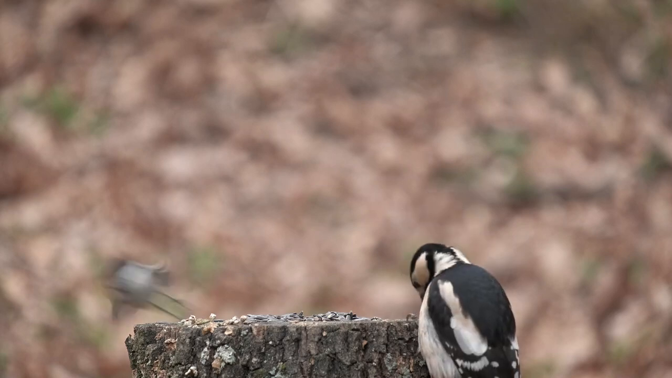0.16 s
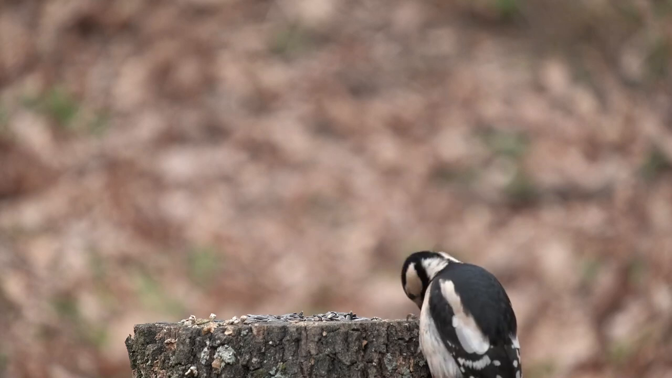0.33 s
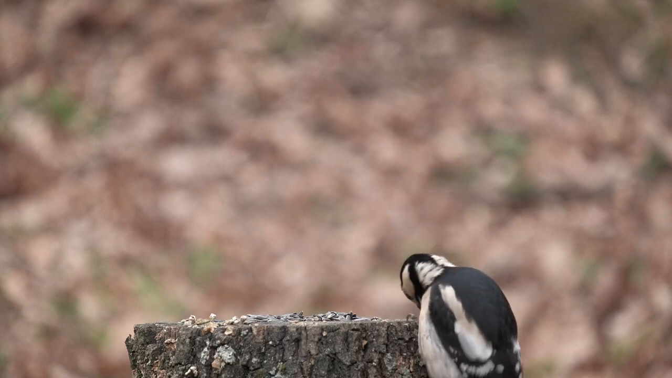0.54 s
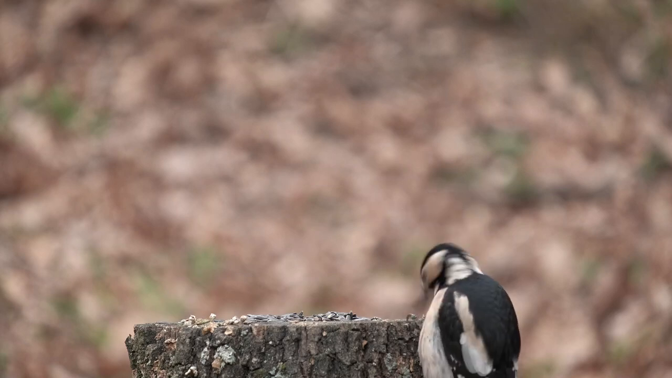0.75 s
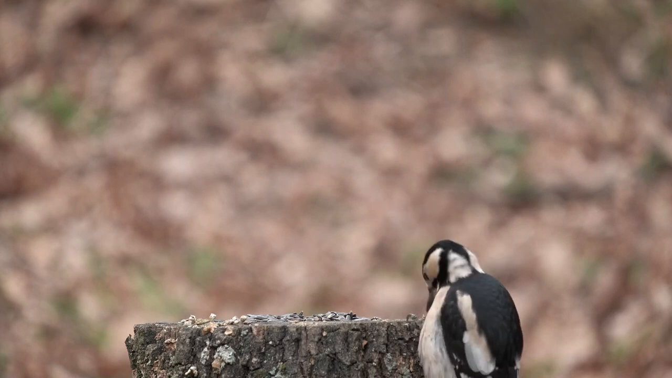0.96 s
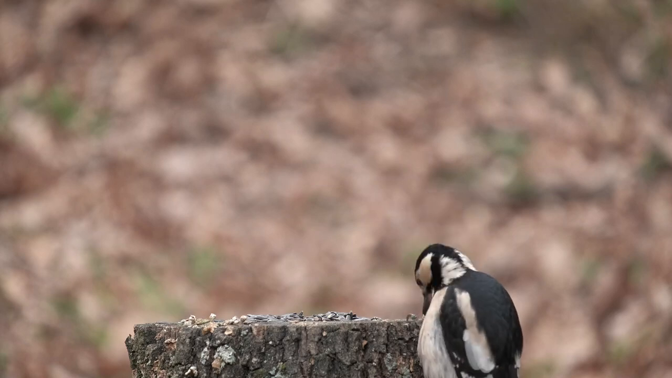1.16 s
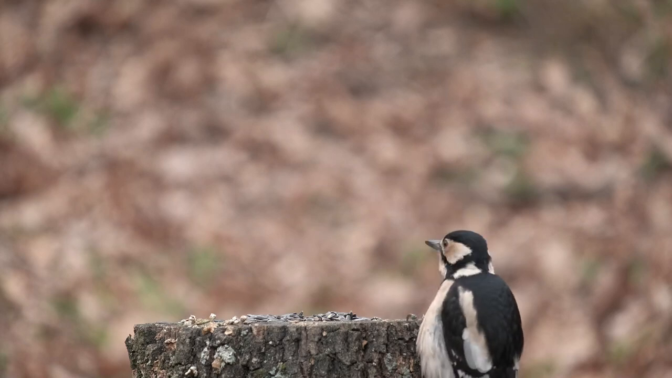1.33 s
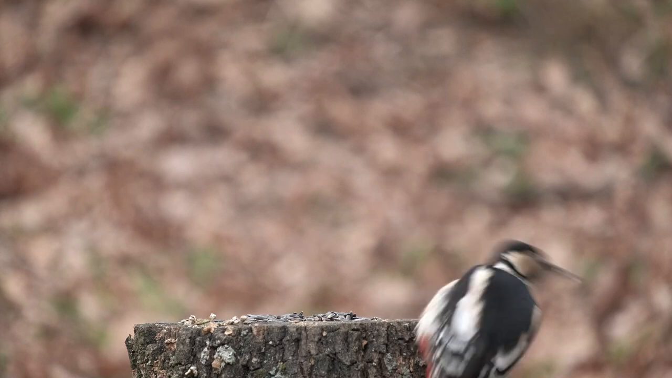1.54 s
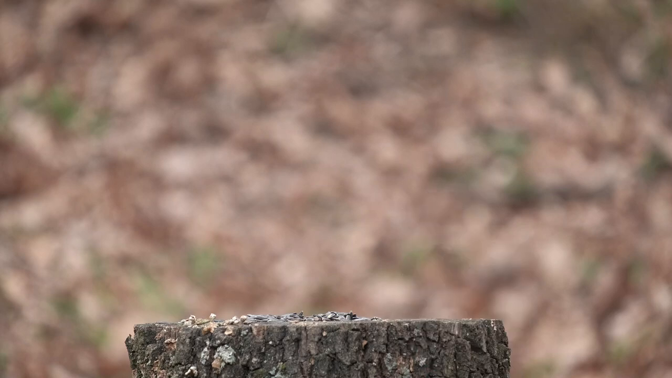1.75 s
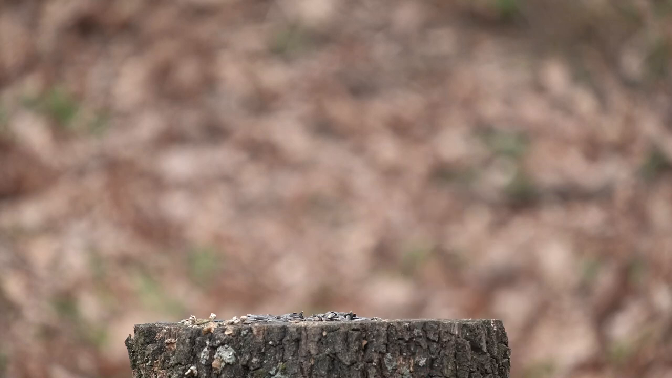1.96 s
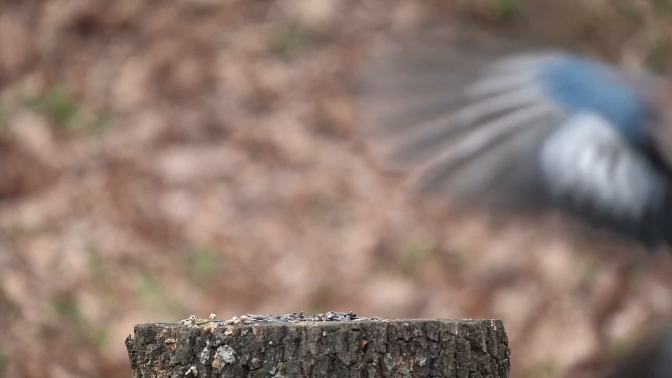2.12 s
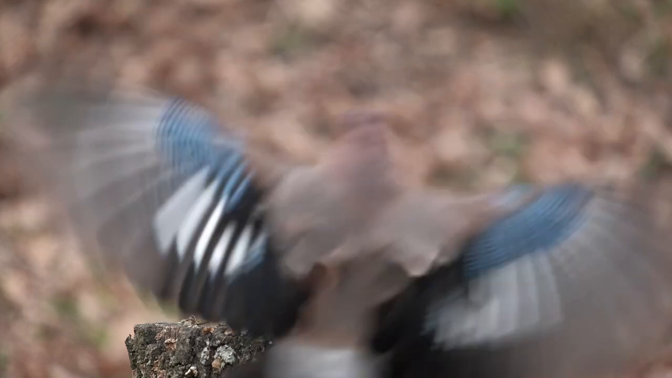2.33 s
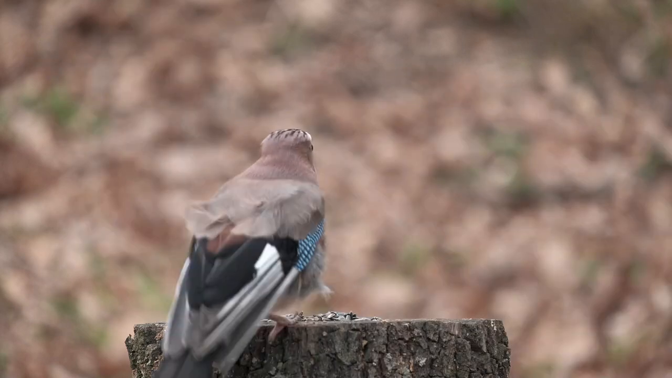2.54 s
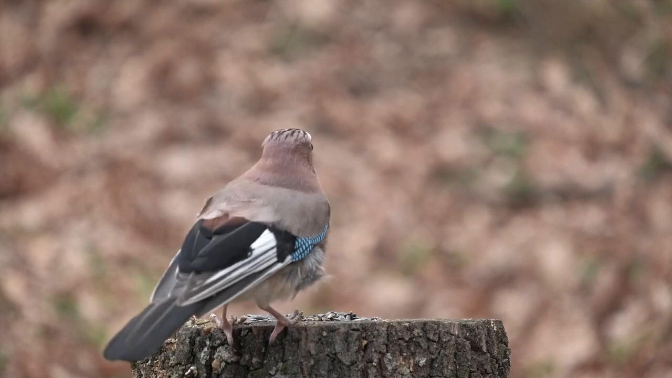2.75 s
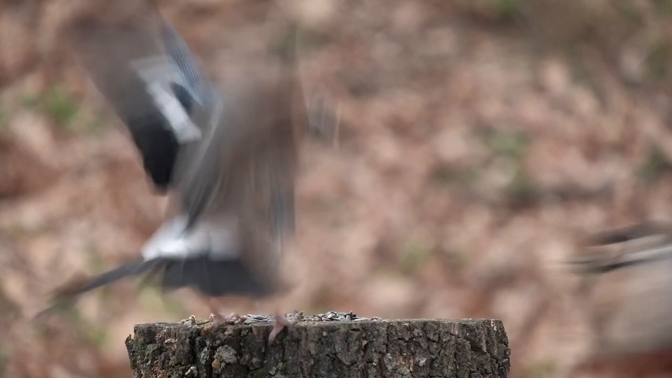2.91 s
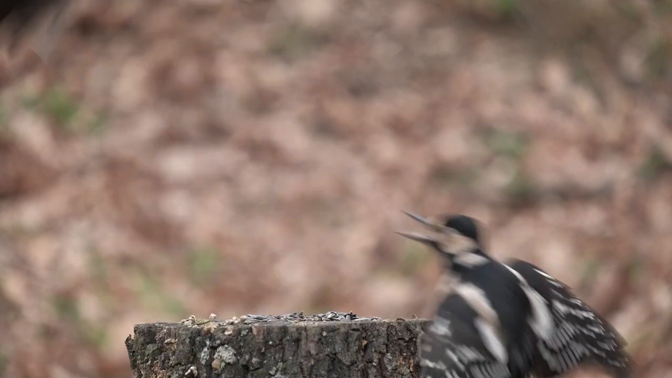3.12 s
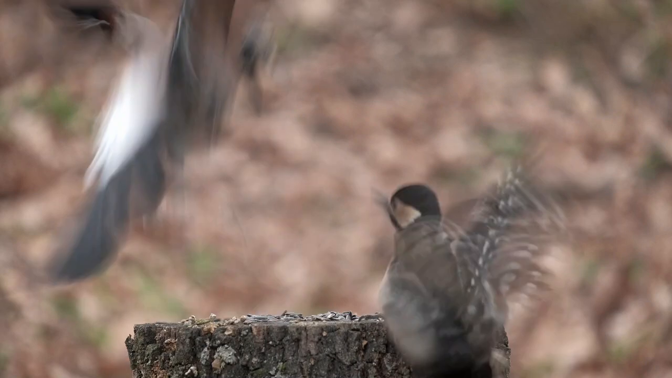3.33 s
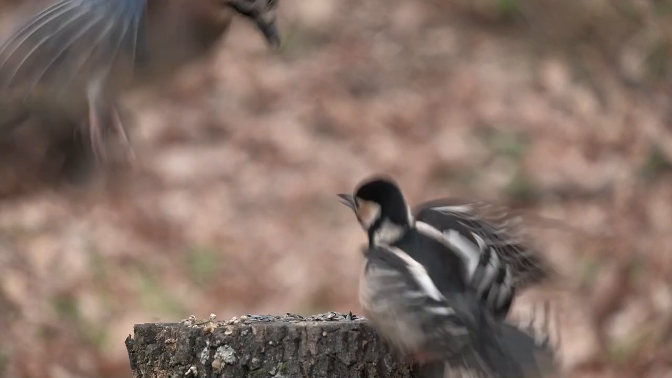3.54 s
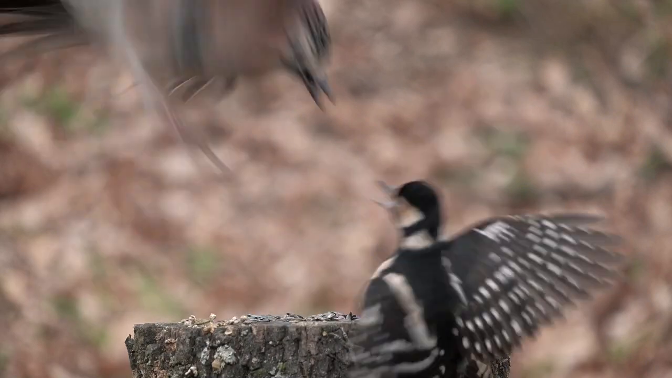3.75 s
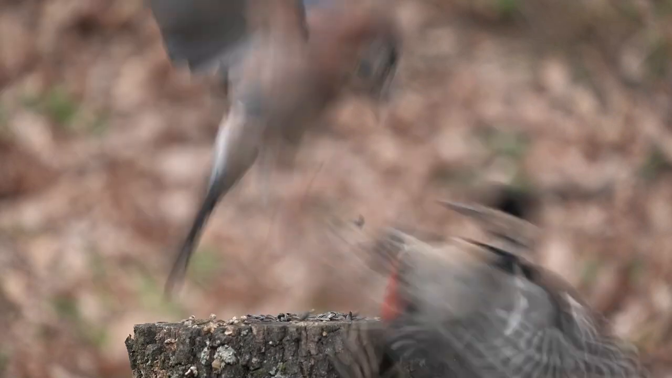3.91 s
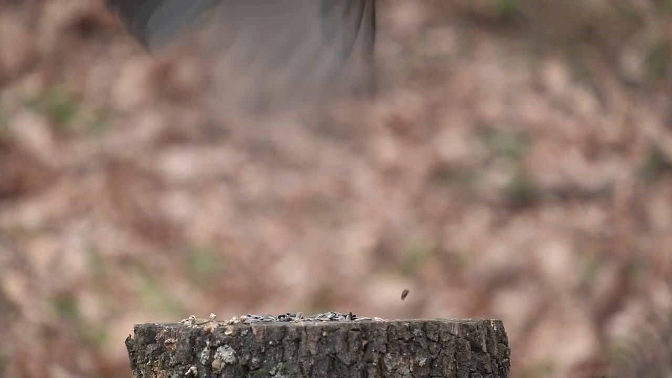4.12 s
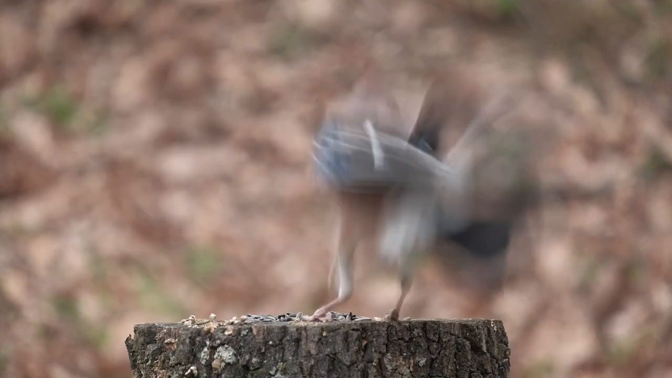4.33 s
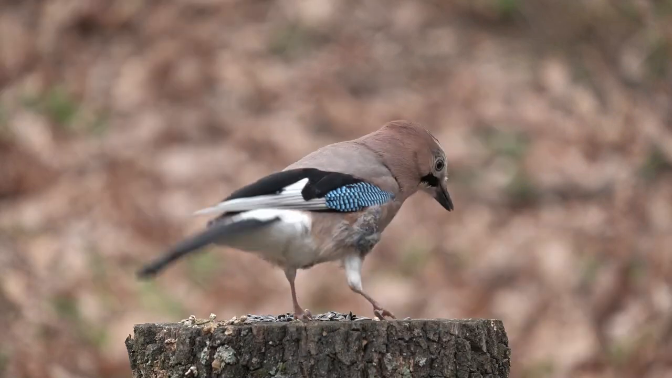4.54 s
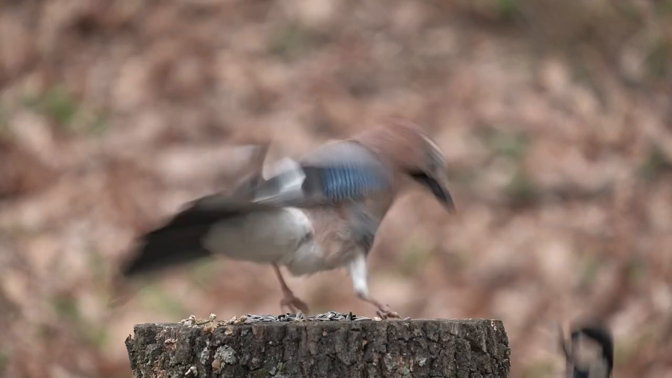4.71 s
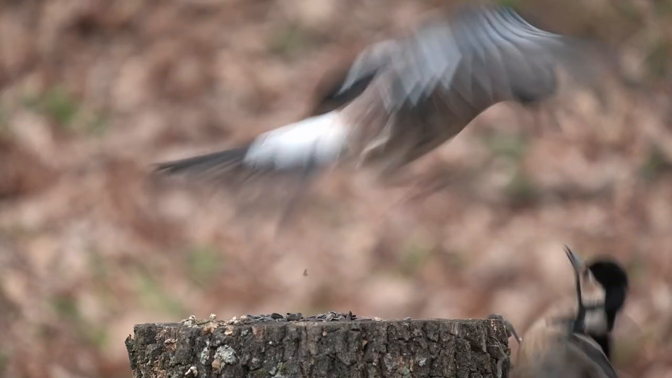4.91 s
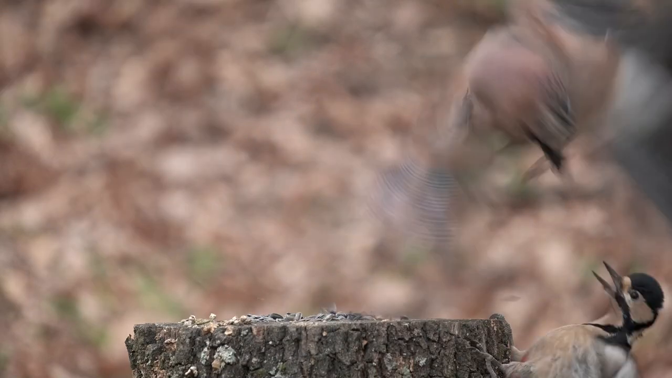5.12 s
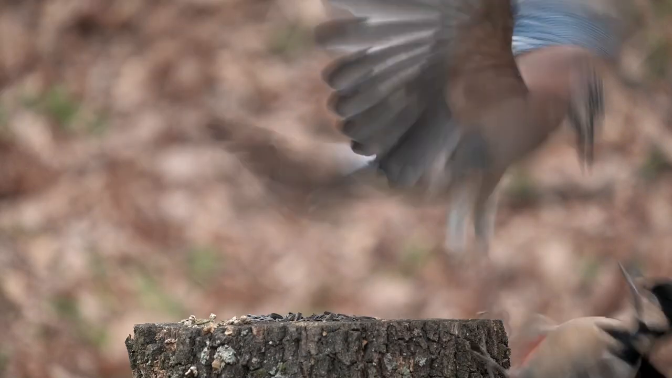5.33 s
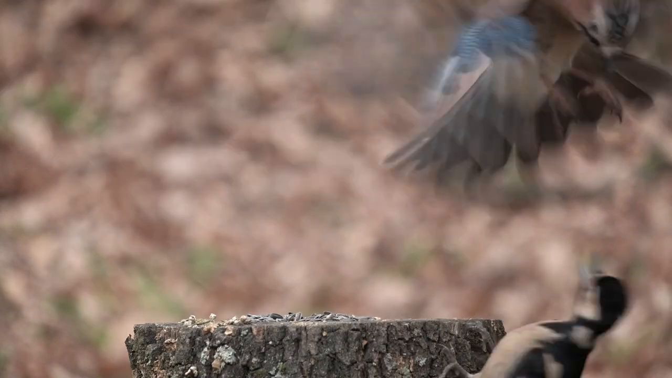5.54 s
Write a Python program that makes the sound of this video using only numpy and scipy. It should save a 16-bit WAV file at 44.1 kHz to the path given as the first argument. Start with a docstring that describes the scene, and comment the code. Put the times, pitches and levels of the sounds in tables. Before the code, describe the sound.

A quiet woodland edge heard close to a stump, with soft hiss, faint distant rumble and a barely noticeable thin high tone. Around 0.4 s a small bird leaves with a few soft, quick wingbeats. Sparse tiny ticks follow, and at 1.1-1.4 s a faint hoarse bird calls far among the trees. From 1.5 to 1.9 s a woodpecker flutters off, with two very high, thin gliding whistles over it. Six short, harsh, upward-flicking scolds run evenly from 1.9 to 2.5 s, each with a bright woodland echo. Low air puffs from big wings begin near 2.2 s. Feather snaps and clicks thicken around 3 s; a hard, dry beak knock lands at 3.4 s. Busy flapping and crisp rustling peak around 4-4.3 s, then ease. A second, louder and slightly duller knock comes at 5.1 s, followed by another wing whoosh and fading rustles until 5.7 s.

```python
"""At a seed-covered stump on a woodland edge, birds come and go close to a camera.
Wings push low air as slow noise lumps; feathers rustle and snap as spiky, coloured noise grains.
A beak strikes twice, exciting short decaying modes. A small bird gives two gliding sine whistles, then
six scolds made of two voices and their combination tones, echoed by decaying noise tails from the trees.
A faint hoarse bird calls through the trees; far rumble, a thin steady band and hiss lie below."""
import sys
import numpy as np
from scipy import signal
from scipy.fft import rfft, irfft, next_fast_len
from scipy.io import wavfile
from scipy.ndimage import uniform_filter1d, map_coordinates

SR = 44100
rng = np.random.default_rng(int(sys.argv[2]) if len(sys.argv) > 2 else 0)


def store_wav(level_fs):
    """Save 16-bit WAV to argv[1]."""
    pcm = np.round(np.clip(np.atleast_2d(level_fs), -1, 1) * 32767)
    wavfile.write(sys.argv[1], SR, pcm.T.astype(np.int16))


N = 250047
TIME = np.arange(N) / SR

# Spectral shape of feather friction: (frequency [Hz], relative density [dB per Hz])
FEATHERS = [(100, 25), (200, 18.5), (465, 5.5), (1000, 1), (2290, -9.5), (3350, -8), (4300, -11),
            (5200, -6), (7270, -13.5), (12400, -1.5), (16000, -7)]
# Centres of the parts from dull to bright, two thirds of an octave apart [Hz]
PARTS_HZ = 100 * 2 ** (np.arange(12) * 2 / 3)
# Short snaps of quills, claws and seeds: (time [s], level [dB], pitch [Hz])
SNAPS = [(.693, -56.5, 5000), (1.048, -53, 4000), (1.504, -49, 3500), (1.768, -43, 1750),
         (1.854, -51, 3770), (2.417, -39, 2260), (2.633, -48, 4970), (2.929, -43.5, 4850),
         (2.9515, -41, 4500), (2.976, -38.5, 2560), (3.008, -35, 4530), (3.098, -47, 7000),
         (3.131, -44, 3080), (3.391, -45, 1800), (3.610, -45, 3560), (3.677, -43.5, 2750),
         (3.731, -42, 1490), (3.945, -40, 1780), (3.9593, -34.5, 5400), (4.069, -31, 3000),
         (4.081, -39.5, 1790), (4.238, -50, 3000), (4.248, -45, 1200), (4.366, -36.5, 1340),
         (4.457, -52, 3030), (4.778, -41.5, 4020), (4.795, -46, 3500), (4.814, -43.5, 2500),
         (4.899, -40, 1980), (4.920, -37.5, 9200), (5.026, -45, 4000), (5.123, -50, 2500),
         (5.135, -44, 1200), (5.224, -36, 3120), (5.232, -37.5, 3230), (5.39, -44.5, 2000),
         (5.454, -54, 4000), (5.518, -46.5, 3970), (5.606, -52, 2500)]
# Softer brushes of a whole wing; each starts 3 ms before its time:
# (time [s], level [dB], pitch [Hz], fall above the pitch [dB per octave], length [s])
BRUSHES = [(0.818, -52, 300, 3, 0.04), (2.996, -41.5, 2800, 6, 0.015), (3.234, -52, 2000, 9, 0.012),
           (3.259, -50, 885, 3.5, .03), (3.38, -56, 2000, -1, 0.012), (3.502, -54, 990, 0.5, 0.021),
           (3.639, -45.5, 1000, 0, 0.0078), (3.707, -52, 1500, 4, 0.016), (3.86, -50.5, 800, 1, 0.014),
           (3.97, -44.5, 700, 2, 0.023), (4.0125, -41.5, 1200, -4.5, 0.0077), (4.046, -46, 180, 3, .012),
           (4.073, -34.5, 990, 0, .013), (4.127, -36, 774, 7.5, 0.011), (4.167, -40, 250, 6, .027),
           (4.2142, -36.5, 1410, 5, 0.013), (4.298, -51.5, 2000, -4.5, 0.017), (4.833, -56, 5000, 4, 0.024),
           (4.9335, -44, 6000, 14, 0.0073), (5.171, -41.5, 2460, 0.5, .024), (5.206, -43, 3000, 7, 0.016),
           (5.29, -55, 5000, 7, 0.0056), (5.349, -52.5, 2980, 2, 0.05), (5.572, -62, 4000, 3, 0.042)]
# Wing beats of two birds leaving, first a small one, then a woodpecker, with the same lead:
# (time [s], level [dB], pitch [Hz])
BEATS = [(0.379, -48, 110), (0.411, -54, 150), (0.446, -49, 130), (.487, -42, 130), (1.464, -51.5, 300),
         (1.502, -47.5, 402), (1.537, -48, 503), (1.582, -49, 450), (1.596, -56, 200), (1.623, -45.5, 200),
         (1.632, -44.5, 494), (1.661, -45, 402), (1.714, -47, 250), (1.754, -50, 298), (1.78, -55, 400),
         (1.823, -50, 250), (1.854, -49.5, 300), (1.9, -57, 300)]
# How busy the wings are: (time [s], whoosh level [dB], feather sliding level [dB])
BUSTLE = [(0, -56.5, -69.5), (1.4, -56, -66.5), (1.5, -54.5, -59), (1.63, -52.5, -55.5),
          (1.87, -52.5, -55.5), (2.4, -55, -54.5), (2.6, -54, -62), (2.66, -57, -66), (3.43, -53.5, -54),
          (3.71, -54.5, -64.5), (3.95, -53.5, -58), (4.17, -47, -52), (4.35, -55, -64.5), (4.67, -56, -62),
          (5.0, -54, -55.5), (5.2, -48.5, -56), (5.67, -58.5, -65.5)]
# Low air stirred once the big bird is near: (time [s], level [dB])
STIR = [(0, -66), (1.39, -59), (1.5, -51.5), (5.67, -53)]
# Lumps of air from single downstrokes: (time of peak [s], level [dB])
DOWNSTROKES = [(2.16, -44), (2.48, -49), (2.76, -46), (2.97, -44.5), (3.11, -46), (3.43, -46.5), (4.3, -54),
               (4.69, -57)]
# Beak blows: (time [s], level [dB], main ring [Hz], relative level of upper part [dB], ring rise [s])
STRIKES = [(3.4192, -11, 1780, -2, 0.000053), (5.0782, -5.5, 1694, -10.5, 0.00054)]
# Other modes of a blow: (frequency [Hz], mean relative level [dB], t60 [s])
BEAK = [(1010, -12, .014), (2330, -4, .0066), (3200, 0, .0056), (4850, -12, .008), (6550, -9, .007),
        (9300, -12, .005)]
# Times and levels of the scold notes: (time [s], level [dB])
SCOLDS = [(1.912, -31), (2.016, -30.5), (2.125, -30), (2.234, -30), (2.345, -30.5), (2.455, -30.5)]
# Combination tones of the two voices: (times low voice [count], times high voice [count])
MIXES = [(1, 0), (2, 0), (0, 1), (1, 1), (2, 1), (-1, 1), (-2, 1), (0, 2)]
# Span of each tone in a note, in the same order: (full from [s], full until [s], relative level [dB])
SOUNDING = [(.008, .045, -3), (.014, .048, -13), (.016, .054, -4), (.011, .038, -3), (.018, .038, -19),
            (.044, .06, -5), (.044, .06, -13), (.032, .042, -22)]
# Frequency response of the throat: (frequency [Hz], gain [dB])
THROAT = [(1500, -33), (2100, -15), (2700, -15.5), (3500, -17), (5000, -6.5), (7000, -7), (8800, -5),
          (11500, -7), (14000, -19)]
# Glides of two whistles, one list each: (time [s], frequency [Hz], level [dB])
WHISTLES = [
    [(1.556, 5000, -54), (1.569, 8400, -31.5), (1.578, 8820, -41), (1.596, 8720, -36), (1.615, 8440, -32),
     (1.634, 8560, -42), (1.642, 8370, -44), (1.651, 7450, -55)],
    [(1.72, 7900, -57), (1.733, 8240, -47), (1.765, 8150, -47), (1.815, 7890, -39.5), (1.84, 7650, -46),
     (1.875, 7500, -57)],
]
# Glides of three faint notes before roughening and the trees: (time [s], frequency [Hz], level [dB])
FAR_BIRD = [
    [(1.07, 4900, -67), (1.095, 4700, -58), (1.15, 3700, -57), (1.18, 3500, -80)],
    [(1.255, 4750, -55), (1.285, 5640, -50), (1.32, 5200, -63), (1.33, 5200, -80)],
    [(1.35, 4830, -73), (1.365, 4600, -49), (1.41, 4060, -65), (1.45, 3600, -80)],
]
# Decay of the woodland echo, scaled for each source: (frequency [Hz], reference t60 [s])
TREES = [(300, 1), (3000, 0.3), (7000, 0.55), (12000, 0.064)]
# Spectral shape of the far rumble: (frequency [Hz], relative density [dB per Hz])
WOODS = [(12, -35), (20, -2.5), (80, -2), (117, 3), (304, -7), (368, -8), (565, -29), (717, -6.5),
         (1650, -13.5), (6000, -39), (7800, -69), (13200, -120)]
# Spectral shape of the microphone hiss: (frequency [Hz], relative density [dB per Hz])
HISS = [(18, -38), (30, -22), (115, -7.5), (174, -8), (303, -8.5), (740, -10), (2680, -15), (16000, -8)]

# Feathers
FEATHER_TOP_HZ = 11300
BELOW_DB_PER_OCTAVE = 11  # fall of the colour under the pitch
SNAP_RISE_S, SNAP_FALL_S, SNAP_DB_PER_OCTAVE = .0006, .0026, 5
BRUSH_RISE = .5  # share of the length
BEAT_S, BEAT_DB_PER_OCTAVE = 0.01, 7
TICK_COUNT, TICK_DB, TICK_HZ = 70, 1, 4000  # least level over the sliding feathers, middle pitch
DOWNSTROKE_S = 0.054  # from the peak of a lump to 1/e

# One scold note: the two sides of the syrinx, before their unsteady pitch
NOTE_S = 0.085
LOW_HZ, LOW_SCOOP_HZ, LOW_SCOOP_S, LOW_DRIFT_HZ_PER_S = 2228, 902, .005, 4400  # the level voice
HIGH_HZ, HIGH_SCOOP_HZ, HIGH_SCOOP_S, CLIMB_HZ_PER_S = 2662, 798, 0.00797, 52000  # the rising voice
FLIP_S, FLIP_SOFT_S, RUSH_HZ_PER_S, CEILING_HZ = .045, 0.0039, 340000, 11200  # then it shoots upward
ATTACK_DB_PER_S, RELEASE_DB_PER_S = 2500, 2200

TOP_HZ = 15800  # band limit of the camera


def feathers():
    """Stick-slip friction: swarms of tiny cracks form spiky noise, split into parts and shaped in time."""
    swell, sliding_db = np.zeros((len(PARTS_HZ), N)), curves(BUSTLE)[1]
    t = np.arange(SR // 50) / SR
    snap = (1 - np.exp(-t / SNAP_RISE_S)) * np.exp(-t / SNAP_FALL_S)
    for s, db, hz in [*SNAPS, *ticks(sliding_db)]:
        add(swell, s, amp(db) * colour(hz, SNAP_DB_PER_OCTAVE) * snap / snap.max())
    beats = [(*beat, BEAT_DB_PER_OCTAVE, BEAT_S) for beat in BEATS]
    for s, db, hz, slope, length in BRUSHES + beats:
        u = np.arange(round(2 * length * SR)) / (length * SR)
        stroke = (1 - np.exp(-u / BRUSH_RISE)) * np.exp(-u ** 3)
        add(swell, s - .003, amp(db) * colour(hz, slope) * stroke / stroke.max())
    swell += amp(sliding_db + 1.43 * wobble(50)) * colour(2400, db_per_octave=0.5)
    grains = patchy(amp(1.83 * wobble(900)) * rng.standard_normal(N), depth_db=3.0)
    coloured = filtered(grains, lambda hz: amp(along(FEATHERS, hz)))
    parts = [unit(filtered(coloured, lambda f: band(hz / 1.3, hz * 1.3)(f) ** 2)) for hz in PARTS_HZ]
    return np.sum(swell * parts, axis=0)


def ticks(sliding_db):
    """Random impulses: chance ticks whose level follows the friction of the sliding feathers."""
    when, size, pitch = rng.random((TICK_COUNT, 3)).T
    s = when * TIME[-1]
    db = np.interp(s, TIME, sliding_db) + TICK_DB - 4 * np.log(size)
    hz = TICK_HZ * 2 ** (2 * pitch - 1)  # within an octave either way
    return zip(s, db, hz)


def colour(hz, db_per_octave):
    """Spectral envelope: gains of the parts, sloping away from a pitch, with total power 1."""
    octaves = np.log2(PARTS_HZ / hz)[:, None]
    below_db = BELOW_DB_PER_OCTAVE * np.minimum(octaves, 0)
    above_db = -db_per_octave * np.maximum(octaves, 0)
    g = amp(below_db + above_db) / (1 + (PARTS_HZ[:, None] / FEATHER_TOP_HZ) ** 4)
    return g / np.linalg.norm(g)


def patchy(x, depth_db):
    """Time-frequency modulation: gain patches of about 1.5 kHz by 15 ms vary the rustle's colour."""
    z = signal.stft(x, nperseg=256)[2]
    field = uniform_filter1d(rng.standard_normal(z.shape), size=9, axis=0)
    field = uniform_filter1d(field, size=5, axis=1)
    return signal.istft(z * amp(depth_db * unit(field)), nperseg=256)[1][:N]


def wings():
    """Turbulent flow: downstrokes push lumps of low air at the microphone, and busy wings whoosh."""
    lumps = sum(amp(db) * np.exp(-((TIME - s) / DOWNSTROKE_S) ** 2) for s, db in DOWNSTROKES)
    push = (amp(curves(STIR)[0] + 2.4 * wobble(7.2)) + lumps) * noise(band(39, 55.0))
    whoosh = amp(curves(BUSTLE)[0] + 1.0 * wobble(40)) * noise(band(56, 690))
    return push + whoosh


def strikes():
    """Modal impact: a hard blow excites short modes and a crack, answered by the stump's top."""
    out, t = np.zeros(N), np.arange(SR // 10) / SR
    for s, db, ring_hz, upper_db, rise in STRIKES:
        upper = np.zeros(len(t))
        for hz, level, t60 in BEAK:
            upper += amp(level + rng.normal(0, 1.5) - 60 * t / t60) * np.sin(2 * np.pi * hz * t)
        upper -= amp(-11 - 60 * t / .006) * rng.standard_normal(len(t))  # the crack
        ring = amp(-60 * t / .012) * np.sin(2 * np.pi * ring_hz * t)
        # a duller contact wakes the main ring slowly
        blow = ring * (1 - np.exp(-(t / rise) ** 2)) + amp(upper_db) * upper
        add(out, s, -amp(db) * blow)
        add(out, s + .0032, amp(db - 10.5) * blow)  # the stump's answer, with opposite sign
    return filtered(out, band(1100, 12000))  # so small a thing sends out little bass


def scolds():
    """Nonlinear coupling: a level and a rising voice in one throat give sum and difference tones."""
    out = np.zeros(N)
    waver = 1 + .018 * np.array([wobble(600), wobble(600)])  # unsteady pitch
    flutter_db = 5 * np.array([wobble(800) for _ in MIXES])  # every tone breaks up on its own
    t = np.arange(round(NOTE_S * SR)) / SR
    low_hz = LOW_HZ - LOW_SCOOP_HZ * np.exp(-t / LOW_SCOOP_S) + LOW_DRIFT_HZ_PER_S * t
    high_hz = HIGH_HZ - HIGH_SCOOP_HZ * np.exp(-t / HIGH_SCOOP_S) + CLIMB_HZ_PER_S * t
    rush_hz = RUSH_HZ_PER_S * FLIP_SOFT_S * np.logaddexp(0, (t - FLIP_S) / FLIP_SOFT_S)
    high_hz = np.minimum(high_hz + rush_hz, CEILING_HZ)
    for s, db in SCOLDS:
        now = slice(round(s * SR), round(s * SR) + len(t))
        hz = [low_hz, high_hz] * waver[:, now]
        phase = 2 * np.pi * np.cumsum(hz, axis=1) / SR
        for mix, (start, end, mix_db), rough_db in zip(MIXES, SOUNDING, flutter_db):
            attack_db = ATTACK_DB_PER_S * np.minimum(t - start, 0)
            release_db = RELEASE_DB_PER_S * np.minimum(end - t, 0)
            throat_db = along(THROAT, np.abs(mix @ hz))
            tone_db = db + mix_db + attack_db + release_db + rough_db[now] + throat_db
            out[now] += amp(tone_db) * np.sin(mix @ phase)
    return out


def whistles(notes):
    """Frequency modulation: pure, thin tones whose phase is the running sum of a gliding frequency."""
    out = np.zeros(N)
    for rows in notes:
        hz, db = curves(rows)
        inside = (TIME > rows[0][0]) & (TIME < rows[-1][0])
        out += inside * amp(db) * np.sin(2 * np.pi * np.cumsum(hz) / SR)
    return out


def far_bird():
    """Random amplitude modulation: it spreads faint whistles into hoarse, breathy notes."""
    return whistles(FAR_BIRD) * wobble(700)


def trees(x, gap, slower):
    """Diffuse reverberation: scattered answers of trunks and ground decay at a rate set by frequency."""
    hz, t, z = signal.stft(rng.standard_normal((2, SR // 2)), SR, nperseg=256)
    t60 = slower * along(TREES, hz)[:, None]
    tail = signal.istft(z * amp(-60 * t / t60), SR, nperseg=256)[1]
    tail = tail[0] + 0.0067 * tail[1] * [[1], [-1]]  # the two ports sit close together
    delayed = np.pad(x, (round(gap * SR), 0))[None]
    return signal.fftconvolve(delayed, tail / np.linalg.norm(tail[0]), axes=1)[:, :N]


def echoes(near, blows, thin, scold):
    """Superposition: each source wakes its own woodland echo, and the far bird is heard only so."""
    wet = amp(-16) * trees(near, .004, 0.74) + amp(-9.0) * trees(thin, 0.0033, 0.66)
    wet += amp(-24) * trees(blows, .006, .35)
    wet += amp(-7) * trees(far_bird(), .001, .7)
    # the trunks return mostly the bright part
    beamed = filtered(scold, lambda hz: band(3300, 10000)(hz) ** 2)
    for s, _ in SCOLDS:  # each scold note gets its own random scattered echo
        note = beamed * (TIME >= s) * (TIME < s + NOTE_S)
        wet += amp(-1.35) * trees(note, 0.0041, 0.77)
    return wet


def background():
    """Coherence: rumble and a thin band near 3.5 kHz reach both ports alike; each has its own hiss."""
    far = amp(-56.5 + 0.41 * wobble(2.6)) * noise(lambda hz: amp(along(WOODS, hz)))
    far += amp(-72 + 1.5 * wobble(8)) * noise(lambda hz: band(3400, 3600)(hz) ** 12)
    hiss = np.array([noise(lambda hz: amp(along(HISS, hz))) for _ in range(2)])
    return far + amp(-55.5) * hiss


def amp(db):
    """Decibel law: level to amplitude."""
    return 10 ** (np.asarray(db) / 20)


def unit(x):
    """Normalisation to rms 1."""
    return x / np.sqrt(np.mean(x ** 2) + 1e-20)


def along(points, hz):
    """Linear interpolation of (frequency [Hz], value) points on a log frequency axis."""
    f, v = np.transpose(points)
    return np.interp(np.log(hz + 1), np.log(f + 1), v)


def curves(rows, t=TIME):
    """Linear interpolation in time: one value per sample for each column after the time."""
    s, *cols = np.transpose(rows)
    return [np.interp(t, s, c) for c in cols]


def wobble(rate):
    """Band-limited fluctuation: a smooth random curve with rate knots a second."""
    return map_coordinates(rng.standard_normal(int(N * rate / SR) + 4), [TIME * rate])


def filtered(x, response):
    """Linear filtering: the spectrum of x times a response of frequency."""
    m = next_fast_len(N + SR // 2)
    return irfft(rfft(x, m) * response(np.fft.rfftfreq(m, 1 / SR)), m)[..., :N]


def band(lo_hz, hi_hz):
    """Band-pass response with rounded edges."""
    return lambda hz: 1 / np.sqrt((1 + (lo_hz / (hz + 1)) ** 6) * (1 + (hz / hi_hz) ** 6))


def noise(response):
    """Shaped random noise of rms 1."""
    return unit(filtered(rng.standard_normal(N), response))


def add(track, s, x):
    """Superposition: mix x into track at s seconds."""
    part = track[..., round(s * SR):round(s * SR) + x.shape[-1]]
    part += x[..., :part.shape[-1]]


def scene():
    """Superposition of the direct sounds, their echoes, the moved air and the background."""
    near, blows, thin, scold = feathers(), strikes(), whistles(WHISTLES), scolds()
    wet = echoes(near, blows, thin, scold)
    return near + blows + thin + scold + wet + wings() + background()


def record(dry):
    """Band limitation: the camera keeps nothing above its top frequency."""
    return filtered(dry, lambda hz: hz < TOP_HZ)


dry = scene()
out = record(dry)
store_wav(out)
```